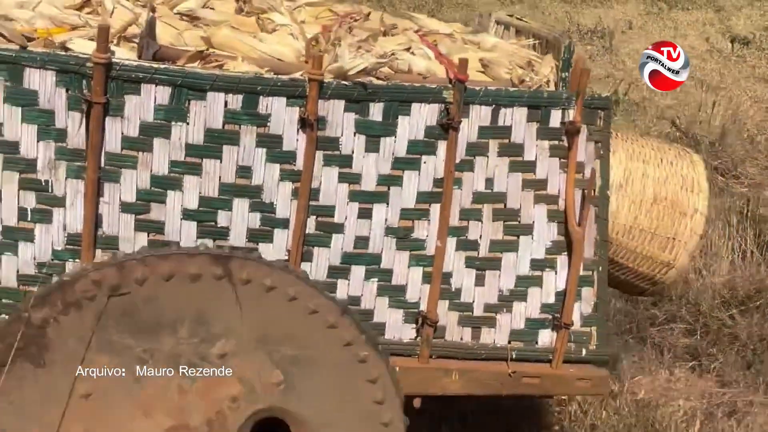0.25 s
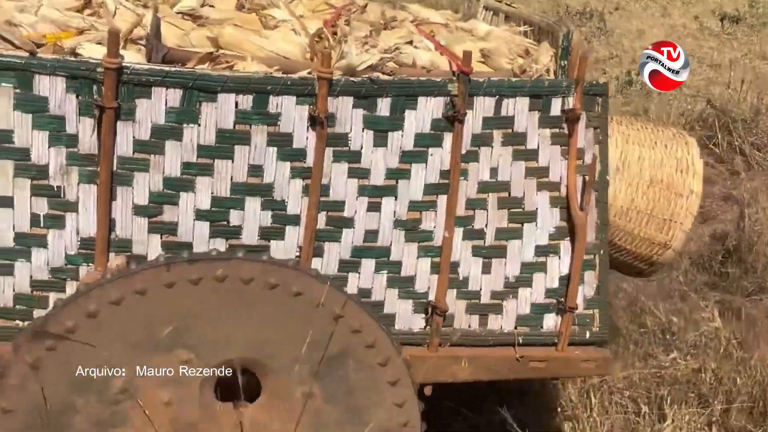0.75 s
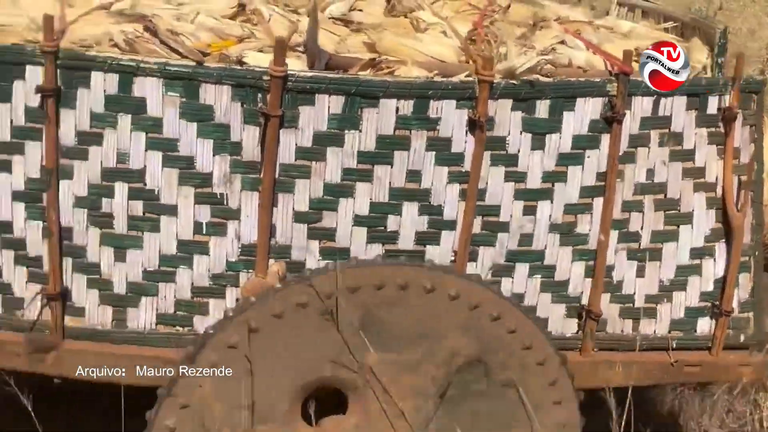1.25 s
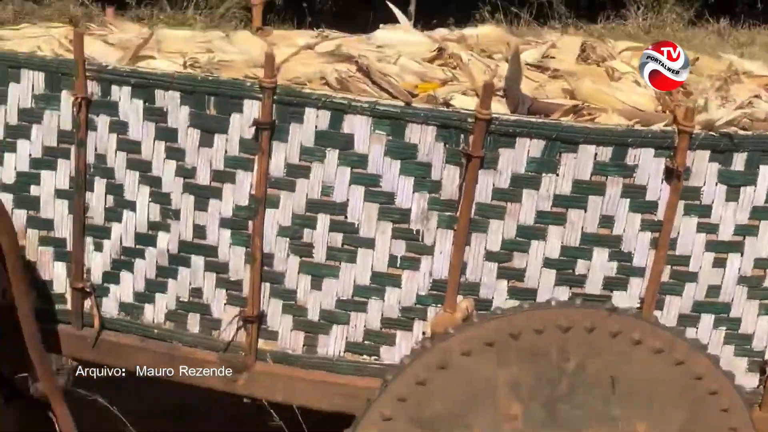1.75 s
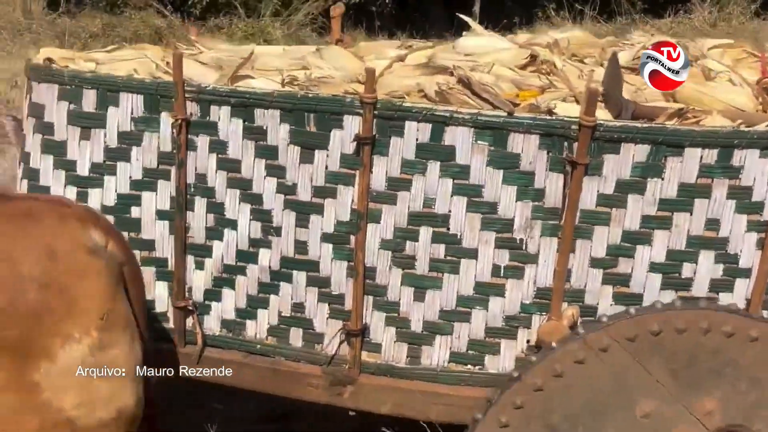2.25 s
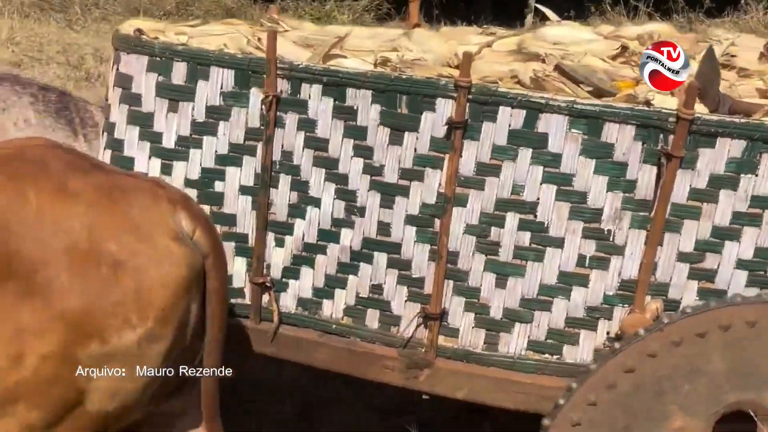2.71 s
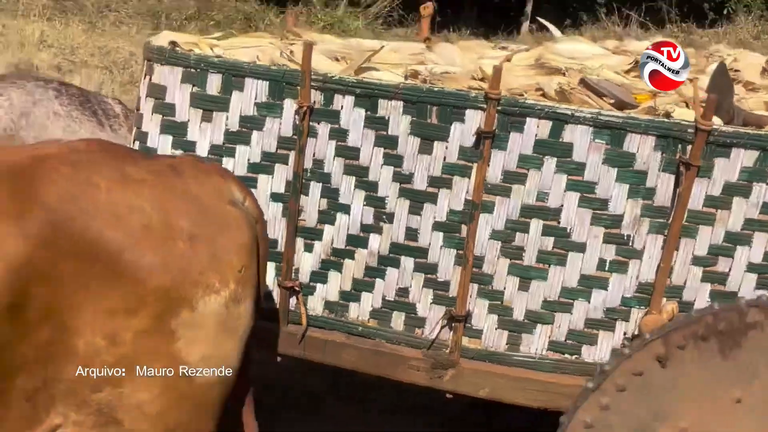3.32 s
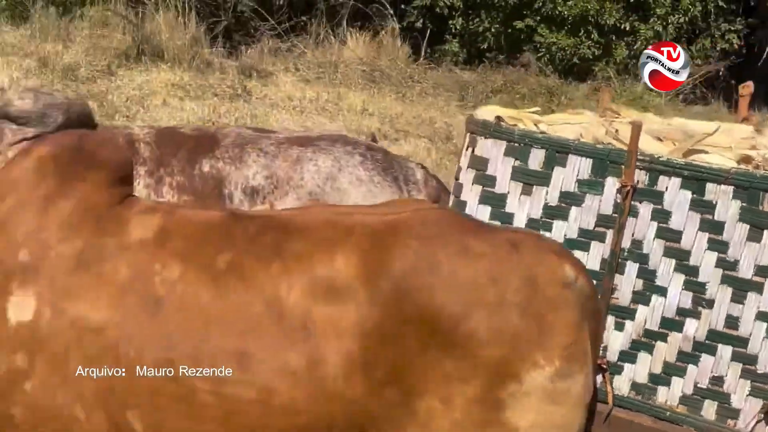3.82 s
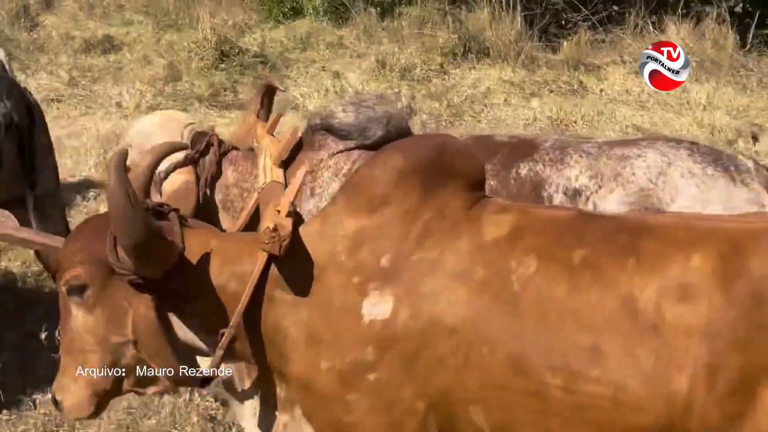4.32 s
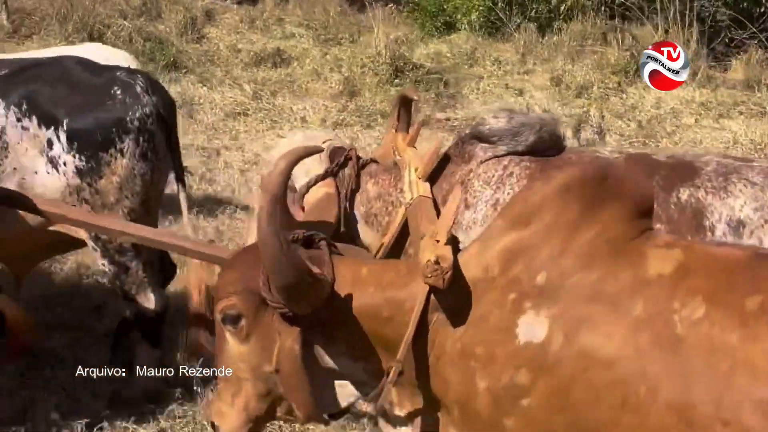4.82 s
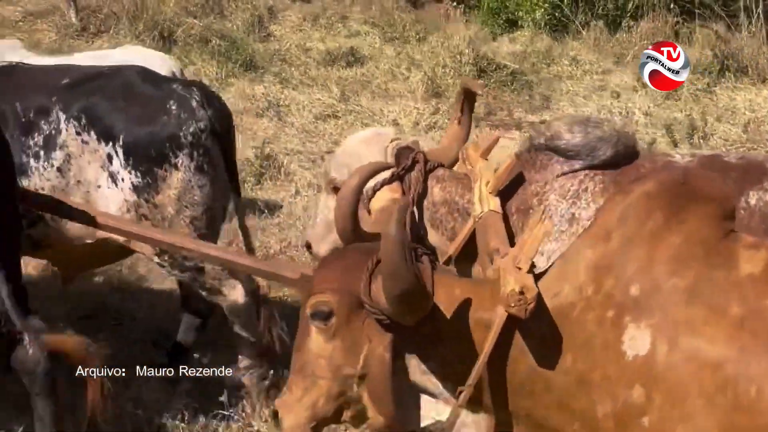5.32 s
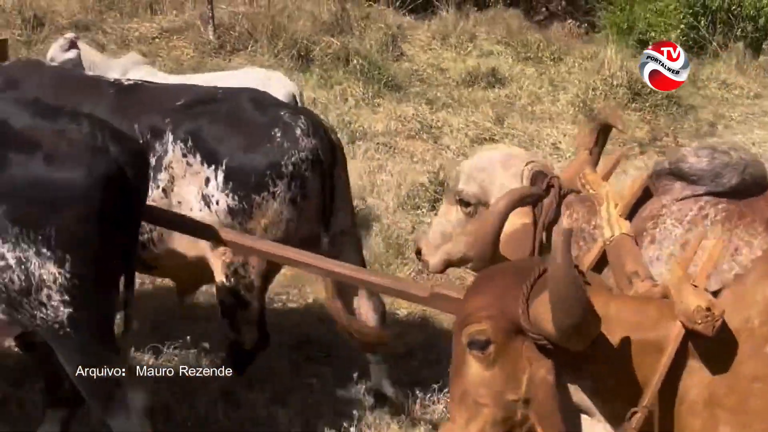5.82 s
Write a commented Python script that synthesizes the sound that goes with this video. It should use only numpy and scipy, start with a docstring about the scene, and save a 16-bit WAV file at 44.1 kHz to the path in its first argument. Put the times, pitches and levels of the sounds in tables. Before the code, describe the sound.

Outdoors, close to a moving ox cart, wood grinds in the axle bearings and makes a steady, horn-like hum with a shifting, buzzy whine on top. The pitch barely wavers, and a soft gritty hiss runs underneath. Two spells of wind buffet the microphone, the second one stronger. A couple of faint knocks come with the first, and several clearer dull knocks with the second.

```python
"""Ox cart axle in the wind

Outdoors by an ox cart, on a two-port stereo microphone. The wooden axle sticks and slips in its
bearings about 200 times a second: a droning stack of harmonics, each fading in and out as the wheels
turn. Dry grit hisses in the bearing, wind buffets the ports, and a few stray tones and knocks sound."""
import sys
import numpy as np
from scipy import signal
from scipy.fft import rfft, irfft, next_fast_len
from scipy.io import wavfile
from scipy.ndimage import uniform_filter1d, map_coordinates

SR = 44100
rng = np.random.default_rng(int(sys.argv[2]) if len(sys.argv) > 2 else 0)


def bounce(signal):
    """Save signal as a 16-bit WAV file at the path given by the first command-line argument."""
    frames = np.transpose(np.atleast_2d(signal))
    limited = np.clip(frames, -1, 1)
    pcm = np.round(limited * 32767).astype(np.int16)
    wavfile.write(sys.argv[1], SR, pcm)


N = 267157

# Slip rate of the axle, drifting up and down: t/s, f/Hz
SLIP_RATE = [(0, 201.3), (.37, 202), (.54, 203.3), (.76, 202), (.86, 201), (1.15, 200.3), (1.52, 199.7),
             (2.13, 197.1), (2.5, 199.2), (2.63, 198), (3.32, 199.9), (3.42, 202.3), (3.76, 201.2),
             (4.1, 202.7), (4.28, 200.8), (4.34, 202.1), (4.82, 198.6), (4.93, 200.2), (5.43, 197.1),
             (5.55, 198.8), (5.62, 196.4), (5.88, 199.5), (6.06, 200)]
# Fundamental of the drone: t/s, level/dB
FUNDAMENTAL = [(0.0, -15), (0.03, -15), (0.3, -17.5), (0.52, -14), (0.76, -26), (0.81, -21), (1.18, -15),
               (1.7, -18.5), (2.01, -12.5), (2.14, -14.5), (2.36, -13.5), (2.88, -23.5), (3.07, -19.5),
               (3.14, -23.5), (3.42, -15), (3.56, -21), (3.85, -12.5), (4.03, -15), (4.12, -19.5),
               (4.44, -16.5), (4.54, -23), (4.72, -16), (4.91, -13.5), (5.01, -16.5), (5.26, -12),
               (5.65, -16.5), (5.77, -22), (6.06, -22.5)]
# Harmonics 2-6 when they do not sing out: level/dB
RESTING_DB = [-45, -34, -38.5, -38.5, -39]
# Stereo side signal of harmonics 1-6, relative to each tone: level/dB, phase/rad
DRONE_SIDE = [(-25.5, 1.7), (-5.5, 1.36), (-1, 1.02), (-2.5, 0.35), (-5.5, 0.25), (-14.5, 0.48)]
# Single harmonics singing out: centre t/s, length/s, harmonic number, peak level/dB
BLOOMS = [(0.035, 0.08, 5, -34), (0.095, 0.19, 6, -32.0), (0.15, 0.2, 4, -34.5), (0.191, 0.11, 10, -36.5),
          (0.21, 0.12, 9, -39), (0.204, 0.22, 11, -41.0), (0.42, 0.23, 5, -38.5), (0.574, 0.81, 3, -29),
          (0.78, 0.19, 4, -32.5), (0.817, 0.084, 13, -34.5), (0.826, 0.055, 2, -33), (0.826, 0.06, 5, -28),
          (0.835, 0.083, 6, -28.5), (0.843, 0.091, 9, -37), (0.832, 0.1, 8, -32), (1.03, 0.13, 8, -37),
          (1.035, 0.22, 12, -38), (1.06, 0.21, 4, -24.5), (1.08, 0.22, 6, -34), (1.175, 0.28, 5, -33.5),
          (1.192, 0.58, 3, -31), (1.38, 0.28, 6, -29), (1.407, 0.41, 2, -37.0), (1.43, 0.21, 7, -42),
          (1.446, 0.092, 12, -35.5), (1.537, 0.19, 3, -27.5), (1.546, 0.13, 5, -33.5),
          (1.566, 0.2, 8, -33.5), (1.576, 0.49, 15, -41), (1.586, 0.37, 4, -28.5), (1.623, 0.46, 9, -33),
          (1.807, 0.34, 6, -31.5), (1.87, 0.15, 12, -41.5), (1.914, 0.14, 9, -38.0),
          (1.917, 0.22, 2, -30.0), (1.927, 0.27, 5, -35), (1.92, 0.26, 3, -26.0), (2.028, 0.36, 7, -40),
          (2.085, 0.089, 14, -36.5), (2.104, 0.17, 8, -28), (2.157, 0.16, 9, -32.5), (2.215, 0.2, 11, -37),
          (2.22, 0.13, 2, -38), (2.335, 0.16, 4, -33), (2.35, 0.09, 10, -32), (2.413, 0.23, 3, -33),
          (2.422, 0.11, 13, -41), (2.448, 0.08, 6, -28.5), (2.463, 0.16, 2, -32.0), (2.67, 0.15, 13, -37),
          (2.665, 0.1, 4, -29.0), (2.7, 0.27, 5, -34.5), (2.712, 0.28, 10, -44), (2.818, 0.19, 7, -42),
          (2.927, 0.24, 4, -36.5), (2.994, 0.6, 6, -32), (3.0, 0.084, 3, -33), (3.095, 0.24, 11, -40),
          (3.101, 0.3, 12, -41.5), (3.1, 0.34, 13, -41.5), (3.249, 0.088, 8, -33.5), (3.26, 0.18, 4, -32.5),
          (3.31, 0.061, 3, -31), (3.316, 0.15, 5, -32.5), (3.56, 0.13, 13, -34), (3.575, 0.31, 5, -31.5),
          (3.65, 0.39, 3, -32), (3.663, 0.11, 10, -38.5), (3.703, 0.45, 6, -29.5), (3.793, 0.27, 15, -42.5),
          (3.846, 0.11, 13, -36), (3.858, 0.39, 2, -38.5), (3.977, 0.071, 5, -39), (4.07, 0.26, 8, -37),
          (4.066, 0.45, 3, -29.5), (4.1, 0.22, 7, -40.5), (4.12, 0.44, 4, -28.5), (4.296, 0.12, 8, -34),
          (4.36, 0.27, 5, -30.5), (4.404, 0.2, 19, -46), (4.423, 0.24, 2, -39), (4.57, 0.15, 4, -33),
          (4.64, 0.2, 2, -37.0), (4.7, 0.69, 3, -36), (4.731, 0.37, 12, -41.5), (4.748, 0.37, 7, -36.5),
          (4.756, 0.11, 4, -36), (4.765, 0.34, 6, -32.5), (4.969, 0.095, 2, -32), (4.977, 0.24, 9, -47),
          (4.986, 0.095, 8, -32), (5.07, 0.03, 2, -36), (5.103, 0.76, 15, -41.5), (5.133, 0.073, 8, -36),
          (5.183, 0.36, 4, -38), (5.245, 0.56, 3, -29), (5.414, 0.47, 7, -38.5), (5.485, 0.13, 3, -31),
          (5.495, 0.15, 9, -40), (5.64, 0.28, 8, -38), (5.72, 0.16, 4, -32.5), (5.765, 0.067, 3, -26.5),
          (5.923, 0.13, 8, -42), (5.93, 0.15, 12, -39.0), (5.93, 0.26, 2, -39)]
# A low harmonic dips briefly: centre t/s, length/s, harmonic number
DROPOUTS = [(0.2, 0.22, 3), (.18, 0.15, 5), (0.366, 0.17, 6), (.55, .06, 5), (0.636, 0.12, 4),
            (.93, 0.05, 6), (1.394, .08, 5), (1.676, 0.053, 3), (2.08, .25, 4), (2.215, 0.11, 5),
            (2.28, 0.39, 6), (2.375, 0.07, 2), (2.59, 0.047, 3), (2.774, 0.043, 4), (3.01, 0.16, 5),
            (3.063, 0.058, 4), (3.242, .3, 2), (3.4, 0.17, 3), (3.415, 0.035, 5), (3.84, 0.25, 4),
            (3.865, 0.043, 5), (4.034, 0.038, 5), (4.08, 0.092, 6), (4.42, 0.076, 4), (4.503, 0.049, 6),
            (4.91, .08, 4), (5.43, 0.042, 6), (5.5, 0.061, 4), (5.594, 0.14, 6), (5.613, 0.042, 3),
            (5.78, .16, 5), (5.91, 0.17, 4)]
# Base strength of each harmonic from the 7th up: f/Hz, level/dB
WHINE_SPECTRUM = [(1400, -43.5), (1700, -42.5), (2000, -43.5), (2500, -41.5), (3000, -46), (3300, -48),
                  (4400, -56), (6000, -51.5), (7500, -50.5), (9300, -56), (10000, -57), (11500, -59.5),
                  (12600, -81)]
# Changing rub in the bearing: t/s, gain/dB of low grit, middle grit, treble grit, whine
RUB_GAINS = [(0, 0, -9, -0.5, -1.5), (.3, 0.5, 1.5, -4.5, -1.5), (.6, -4, -2, -2.5, 0.5),
             (.9, 1, -9, 0.5, -1), (1.2, -1, -1, 1, 0.5), (1.5, -8, -4, 0, 0.5), (1.8, -1, -5, -1, 3),
             (2.1, -1.5, 1, 0.5, 1.5), (2.45, 3, -12, 0.5, -3), (2.75, -11, 0, -1, 1.5),
             (3.05, -11, -7, 1, 4), (3.2, -17, -2, -1.5, 2), (3.4, 0, -2.5, -1, -4), (3.6, 0, -6, -2, -1.5),
             (4.05, -0.5, -7, 0, 0.5), (4.22, -7, -2, -3, -2), (4.48, -4, -4, 1.5, -1),
             (4.8, -4, -10, -2.5, 0), (5.1, -7, -11, -2, 0.5), (5.45, 0.5, 0, 0.5, -5),
             (5.8, -2.5, -8, -2.5, -4.5), (6.06, -14, 0, -0.5, 0)]
# Hiss of the grit: f/Hz, relative density/dB
GRIT_SPECTRUM = [(300, -75), (560, 2), (700, -8.5), (900, -1), (1700, -6.5), (2600, -1), (4200, -8),
                 (6000, -6), (9400, 3), (9800, 0), (11000, -12), (12300, -13), (13600, -26.5), (14000, -40)]
# Random swing of the low, middle and treble grit: depth/dB
GRIT_SWING_DB = (4, 1, 1)
# Flares in the middle range of the grit: centre t/s, length/s, peak gain/dB
SCRAPES = [(.25, .14, 0), (.84, 0.11, 5), (2.39, 0.22, 7.5), (2.62, 0.053, 6), (2.93, .2, 6),
           (3.55, .1, 7.5), (4.05, 0.099, 4.5), (4.33, .1, 3), (5.43, 0.15, 3)]
# Phase lead of the microphone's left port: f/Hz, lead/half turns
PORT_LEAD = [(300, 0), (1900, .05), (2400, .7), (3900, .85), (4700, 1), (5500, 1.93), (6100, 2.03),
             (7600, 2.7), (8400, 2.97), (9100, 3), (11000, 3.1), (11800, 4), (13200, 4), (13900, 5)]
# Likeness of the two ports apart from that lead: f/Hz, coherence (0-1)
PORT_COHERENCE = [(300, 0.44), (700, 0.33), (1500, 1), (2500, 0.65), (3900, 0.033), (4700, 0.85), (6000, 1),
                  (7200, 0.32), (8300, 0.97), (9550, 1.0), (10000, 0.13), (11000, 0.17), (11600, 0.72),
                  (11900, 0.36)]
# Balance of the ports: f/Hz, left minus right level/dB
PORT_BALANCE = [(1300, 1), (2300, -4), (3300, -2), (4600, 0)]
# Buffets on the ports: centre t/s, length/s, peak rumble level/dB, flutter relative to rumble/dB
GUSTS = [(2.3, .2, -32, -8.5), (2.46, 0.19, -28, -12), (2.553, 0.099, -19.5, -9.5), (2.69, 0.1, -28.5, -31),
         (3.03, 0.15, -34, -28), (3.126, .07, -33, -31), (3.231, 0.11, -28.5, -25),
         (4.306, 0.09, -29.5, -2.5), (4.625, .14, -31, -8), (4.738, 0.091, -36, -15), (4.86, 0.044, -26, 0),
         (4.943, .2, -33, 0), (4.97, .05, -23, 4.5), (5.037, 0.084, -14.5, -17), (5.1, 0.13, -25.5, -7),
         (5.222, .06, -29, -12), (5.394, 0.037, -26, -24), (5.52, 0.18, -39, 0), (5.813, 0.027, -21, -14),
         (5.865, .08, -32, -20), (6.007, .05, -29, -25)]
# Rumble of the breeze between buffets: t/s, level/dB
BREEZE = [(0, -48), (.5, -50.5), (2.06, -52), (2.5, -42), (2.85, -41), (3.25, -44), (3.45, -61),
          (4.05, -50), (4.5, -43), (5, -32), (5.3, -49), (5.72, -52), (6.06, -55)]
# Rumble, the lower part of the wind: f/Hz, relative density/dB
RUMBLE_SPECTRUM = [(15, -48), (30, -29), (54, 3), (85, -1), (130, -1.5), (170, 0.5), (230, -8), (370, -120)]
# Flutter, the upper part of the wind: f/Hz, relative density/dB
FLUTTER_SPECTRUM = [(150, -2.5), (230, 6), (350, -3), (500, -10), (750, -20.5), (1000, -76)]
# Brief tones off the harmonics: centre t/s, length/s, f/Hz, peak level/dB
STRAY_TONES = [(0.25, 0.052, 2115, -38), (0.261, 0.086, 1920, -39), (2.387, 0.065, 1670, -40),
               (2.383, .06, 1880, -38), (2.958, 0.051, 1670, -41), (5.677, 0.016, 594, -29.5),
               (5.872, 0.18, 618, -37)]
# Dull knocks: t/s, nominal level/dB, f/Hz, time to fall 60 dB/s
KNOCKS = [(2.42, -30, 300, 0.028), (2.565, -35, 305.5, 0.031), (4.475, -15.5, 308, 0.019),
          (4.852, -20, 305, 0.029), (4.914, -22, 299.8, 0.037), (5.058, -12.5, 315.5, 0.021),
          (5.194, -24, 301.7, 0.037), (5.809, -22, 305, 0.031)]


def amp(db):
    return 10 ** (np.asarray(db) / 20)


def unit_rms(x):
    return x / np.sqrt(np.mean(abs(x) ** 2) + 1e-20)


def at_hz(points, hz):
    """Read (f/Hz, value) points along a log frequency axis."""
    freqs, values = np.transpose(points)
    return np.interp(np.log(hz + 1), np.log(freqs + 1), values)


def curves(rows):
    """One value per sample for each column after the time."""
    times, *columns = np.transpose(rows)
    return [np.interp(np.arange(N) / SR, times, column) for column in columns]


def wobble(rate):
    """A smooth random curve, rate knots a second."""
    hop = 64
    coarse = np.arange(0, N + hop, hop)
    smooth = map_coordinates(rng.standard_normal(400), [coarse * rate / SR + 2])
    return np.interp(np.arange(N), coarse, smooth)


def fading(rate):
    """Many paths adding at drifting phases: a complex gain with deep nulls."""
    return (wobble(rate) + 1j * wobble(rate)) / np.sqrt(2)


def swell(centre, length, db):
    """A rounded rise and fall that peaks at db."""
    return amp(db) * np.exp(-abs((np.arange(N) / SR - centre) / (0.55 * length)) ** 1.61)


def swells(rows):
    """Swells (t/s, length/s, level/dB) adding in power."""
    return np.sqrt(sum((swell(*row) ** 2 for row in rows), np.zeros(N)))


def filtered(x, response):
    """Pass x through a gain given as a function of frequency."""
    size = next_fast_len(N + SR // 2)
    return irfft(rfft(x, size) * response(np.fft.rfftfreq(size, 1 / SR)), size)[..., :N]


def port_gains(hz):
    """2 x 2 gains that carry two unrelated signals to the microphone's left and right port."""
    angle = np.arccos(np.clip(at_hz(PORT_COHERENCE, hz), 0, 1)) / 2
    shared, opposed = np.cos(angle), np.sin(angle)
    left = amp(at_hz(PORT_BALANCE, hz) / 2) * np.exp(.5j * np.pi * at_hz(PORT_LEAD, hz))
    return np.array([[left * shared, left * opposed], [shared / left, -opposed / left]])


def slip_cycle():
    """The axle sticking and slipping: a phasor that turns once a slip, at a slightly unsteady rate."""
    hz = curves(SLIP_RATE)[0] * (1 + 0.000706 * wobble(8) + 0.00067 * wobble(25))
    return np.exp(2j * np.pi * np.cumsum(hz) / SR)


def blooms(k):
    """Envelope of harmonic k singing out."""
    return swells((centre, length, db) for centre, length, harmonic, db in BLOOMS if harmonic == k)


def low_harmonic_level(k, resting_db, dropout_db=-20.5):
    """Envelope of low harmonic k: a wavering base, its blooms, its dropouts."""
    dips = [1 - (1 - amp(dropout_db)) * swell(centre, length, 0)
            for centre, length, harmonic in DROPOUTS if harmonic == k]
    base = amp(resting_db + 2.56 * wobble(11))
    return np.hypot(blooms(k), base) * np.prod(dips, axis=0)


def axle_drone(cycle):
    """The six lowest harmonics of the slip: strong, clean, their phases sliding against each other."""
    out = np.zeros((2, N))
    levels = [amp(curves(FUNDAMENTAL)[0])]
    levels += [low_harmonic_level(k, db) for k, db in enumerate(RESTING_DB, start=2)]
    for overtone, (level, (side_db, phase)) in enumerate(zip(levels, DRONE_SIDE)):
        flicker = amp(0.36 * overtone * wobble(16))
        drift = np.exp(.45j * overtone * wobble(1.989))
        tone = np.sqrt(2) * level * flicker * drift * cycle ** (overtone + 1)
        side = amp(side_db) * (0.78 * np.exp(1j * phase) + 0.45 * fading(3) + 0.3 * fading(45))
        out += np.imag(tone * np.array([1 + side, 1 - side]))
    return out


def axle_whine(cycle, top_harmonic):
    """High harmonics fade on their own, faster the shorter the wave; sharper slips lift them all."""
    out, tone = np.zeros((2, N)), cycle ** len(DRONE_SIDE)
    sharpness = amp(curves(RUB_GAINS)[3] + 1.54 * wobble(16))
    for k in range(len(DRONE_SIDE) + 1, top_harmonic + 1):
        tone = tone * cycle
        hz = k * SLIP_RATE[0][1]
        level = sharpness * amp(at_hz(WHINE_SPECTRUM, hz))
        paths = level * np.array([fading(4 + .15 * k), fading(4 + 0.1484 * k)])
        bloom_level = blooms(k) * amp(3.05 * wobble(20))
        bloom_phase = 2.6 * wobble(1.995) + 0.55 * wobble(30)
        # a bloom reaches the ports more nearly in step
        side = .75j * np.tan(.5 * np.pi * min(at_hz(PORT_LEAD, hz), .65)) - .15
        bloom = bloom_level * np.exp(1j * bloom_phase) * np.array([[1 + side], [1 - side]])
        out += np.imag(np.sqrt(2) * tone * (port_gains(hz) @ paths + bloom))
    return out


def patchy_noise(depth_db):
    """Two noises that share patches of random gain in time and frequency."""
    spectra = signal.stft(rng.standard_normal((2, N)), nperseg=512)[2]
    patches = uniform_filter1d(rng.standard_normal(spectra.shape[1:]), 6, axis=0)
    patches = uniform_filter1d(patches, 8, axis=1)
    return signal.istft(spectra * amp(depth_db * unit_rms(patches)), nperseg=512)[1][:, :N]


def bearing_grit(cycle):
    """Dry grit rubbing in the bearing, strongest at each slip; its three ranges swell separately."""
    slip_pulse = 1 + 0.16 * cycle.real + 0.15 * (cycle ** 2).real
    size = next_fast_len(N)
    hz = np.fft.rfftfreq(size, 1 / SR)
    rub = rfft(slip_pulse * patchy_noise(depth_db=3.0), size)
    spectrum = np.einsum("abf,bf->af", port_gains(hz), rub) * amp(at_hz(GRIT_SPECTRUM, hz))
    rms = np.sqrt(np.mean(irfft(spectrum, size) ** 2))
    low = 1 / (1 + (hz / 1500) ** 4)
    treble = 1 / (1 + (3500 / (hz + 1)) ** 6)
    bands = [irfft(spectrum * share, size)[:, :N] for share in (low, 1 - low - treble, treble)]
    low_db, middle_db, treble_db, _ = curves(RUB_GAINS)
    gains = amp(low_db), np.hypot(amp(middle_db), swells(SCRAPES)), amp(treble_db)
    hiss = sum(gain * amp(swing_db * wobble(11)) * band
               for gain, swing_db, band in zip(gains, GRIT_SWING_DB, bands))
    return amp(-31.5) * hiss / rms


def wind_on_microphone(breeze_swing_db=3, breeze_flutter_db=-45.5):
    """Lumpy buffets over a light breeze, right at the ports and partly shared by them."""
    gust_rumble = swells(row[:3] for row in GUSTS)
    gust_flutter = swells((centre, length, db + offset_db) for centre, length, db, offset_db in GUSTS)
    rumble = np.hypot(gust_rumble, amp(curves(BREEZE)[0] + breeze_swing_db * wobble(24)))
    flutter = np.hypot(gust_flutter, amp(breeze_flutter_db + 4.3 * wobble(16)))
    out = np.zeros((2, N))
    for spectrum, level in ((RUMBLE_SPECTRUM, rumble), (FLUTTER_SPECTRUM, flutter)):
        mid, side = filtered(rng.standard_normal((2, N)), lambda hz: amp(at_hz(spectrum, hz)))
        lumps = amp(1.8 * wobble(40))
        out += level * unit_rms(lumps * np.array([mid + .27 * side, mid - .27 * side]))
    return out


def stray_tones():
    """Short tones off the stack; near a harmonic they make it warble."""
    out, t = np.zeros(N), np.arange(N) / SR
    for centre, length, hz, db in STRAY_TONES:
        phase = 2 * np.pi * hz * (t - centre) + .5 * wobble(14)
        out += np.sqrt(2) * swell(centre, length, db) * np.sin(phase)
    return out


def knocks(attack_s=0.00099):
    """Dull knocks that hardly ring: one damped tone each, centred between the ports."""
    out, t = np.zeros(N + SR), np.arange(SR // 10) / SR
    for start, db, hz, t60 in KNOCKS:
        envelope = amp(db + 7.5 - 60 * t / t60) * (1 - np.exp(-t / attack_s))
        out[round(start * SR):][:len(t)] += envelope * np.sin(2 * np.pi * hz * t)
    return out[:N]


def scene():
    """The cart and the wind at the microphone; one slip cycle drives drone, whine and grit."""
    cycle = slip_cycle()
    tones = axle_drone(cycle) + axle_whine(cycle, top_harmonic=62) + stray_tones()
    return tones + bearing_grit(cycle) + wind_on_microphone() + knocks()


def record(dry):
    """The recorder keeps nothing above its band limit."""
    limit_hz = 14360
    return filtered(dry, lambda hz: hz < limit_hz)


dry = scene()
out = record(dry)
bounce(out)
```